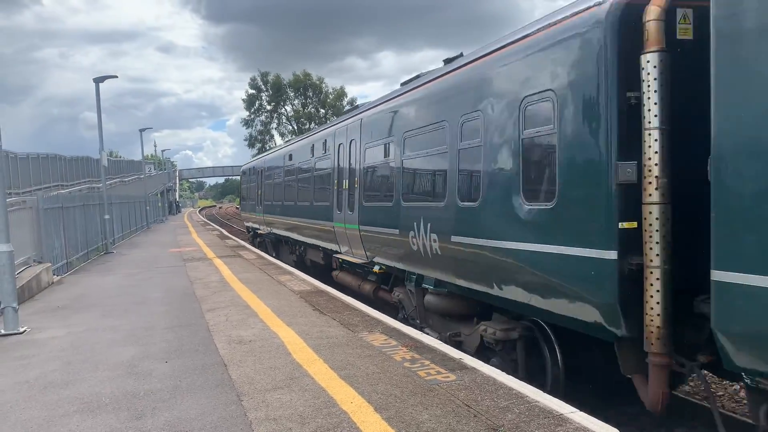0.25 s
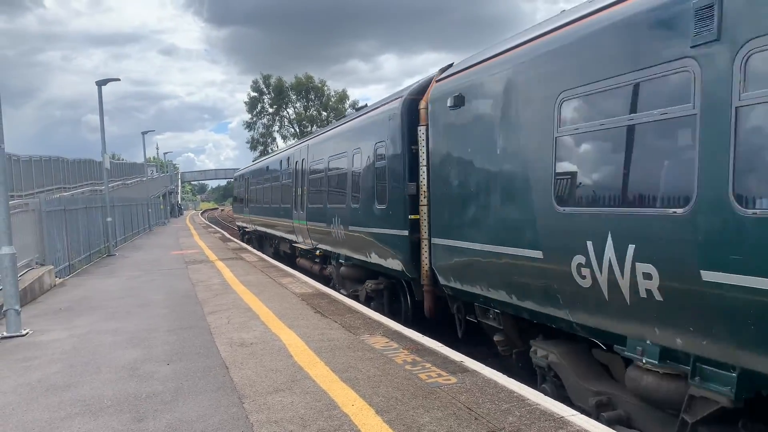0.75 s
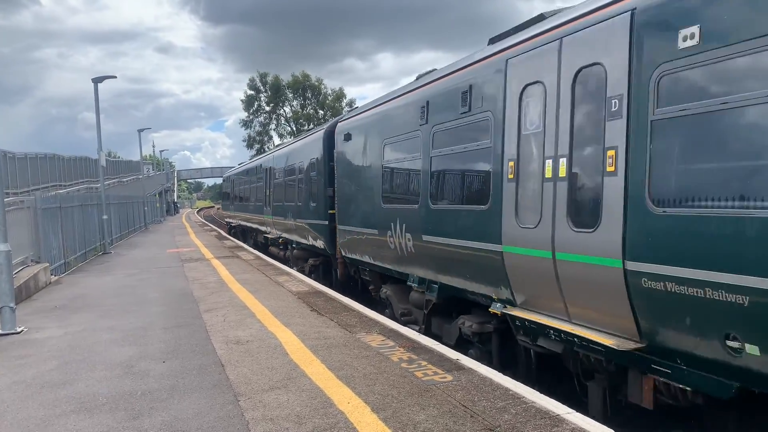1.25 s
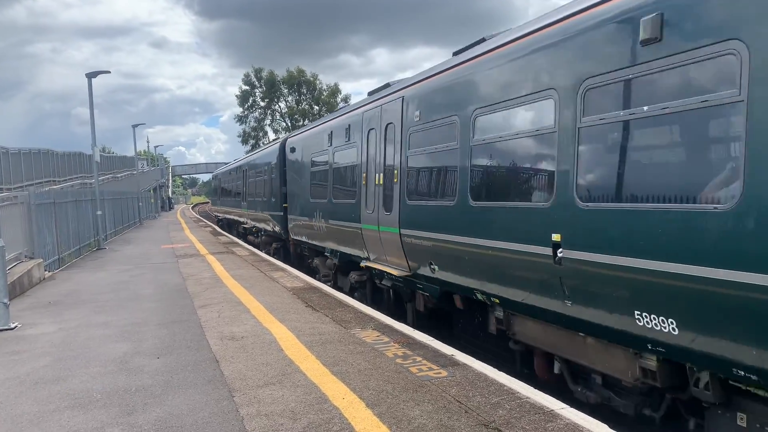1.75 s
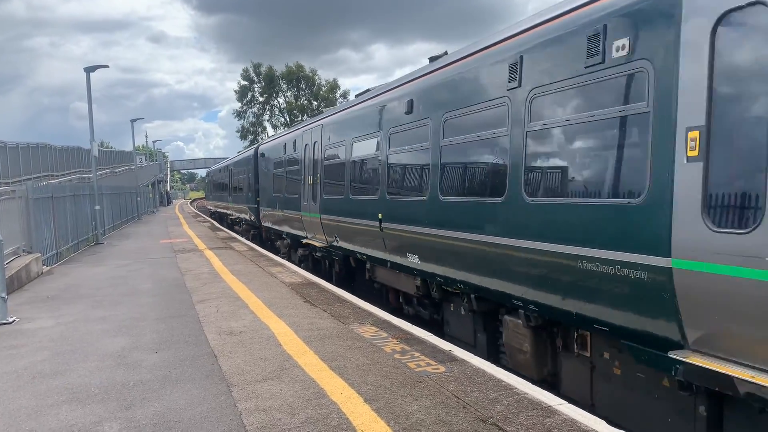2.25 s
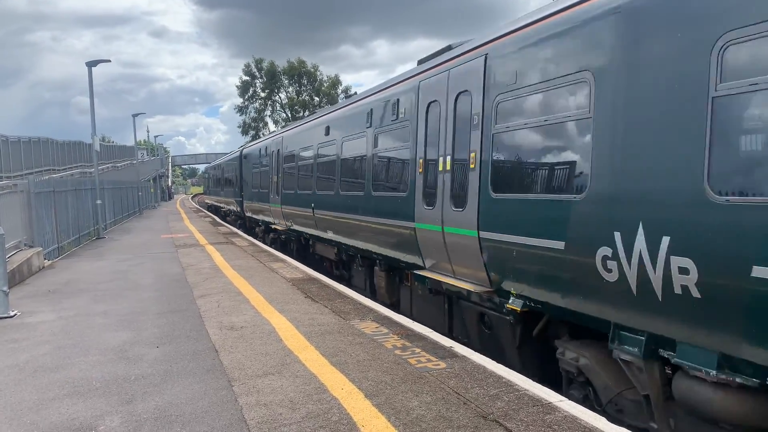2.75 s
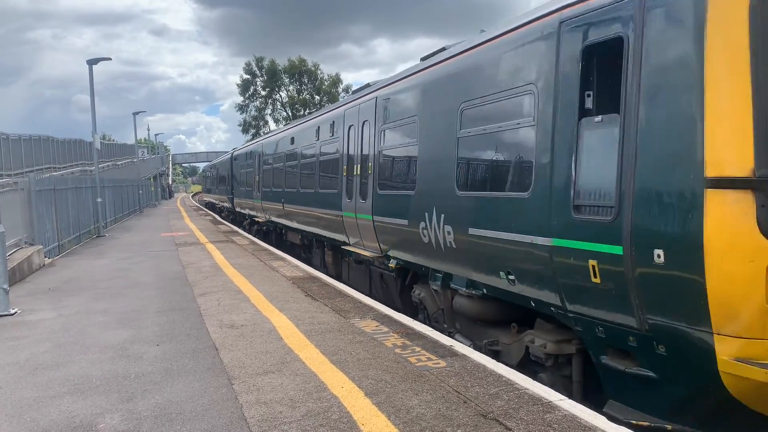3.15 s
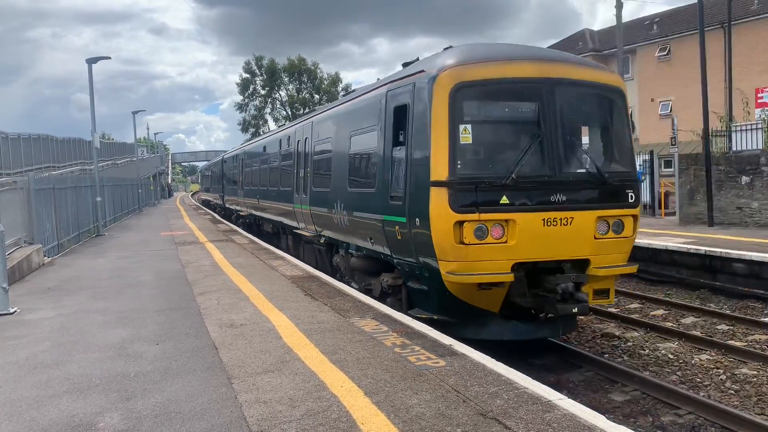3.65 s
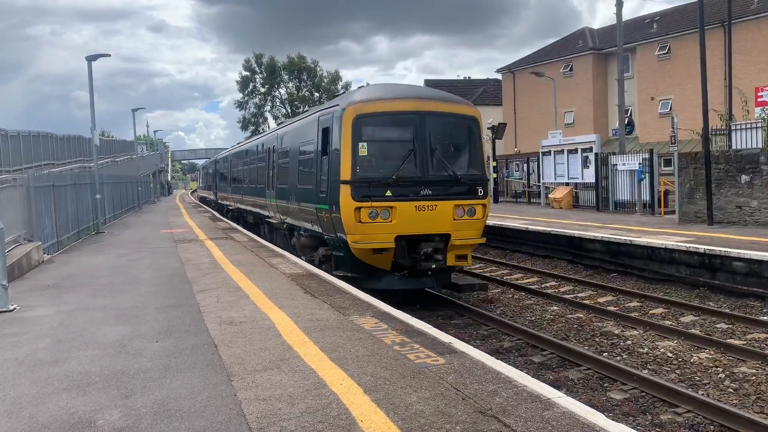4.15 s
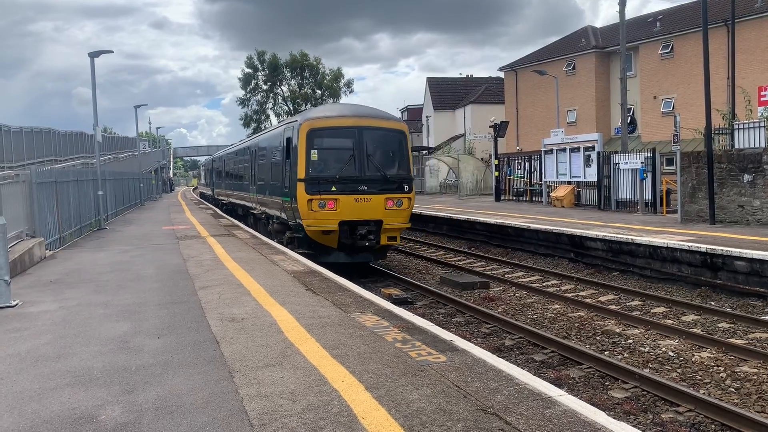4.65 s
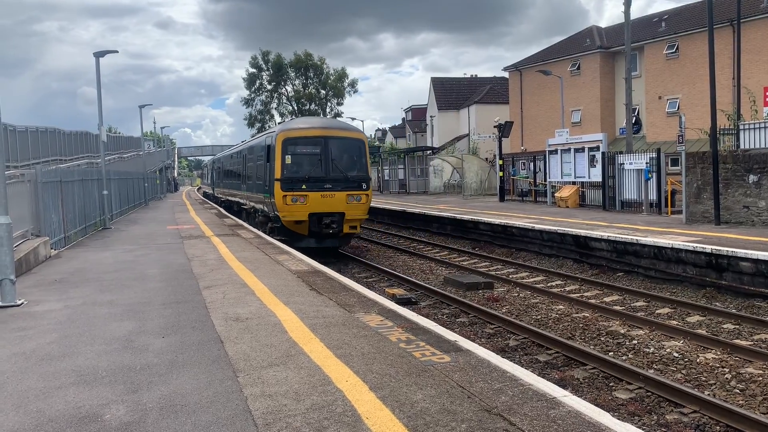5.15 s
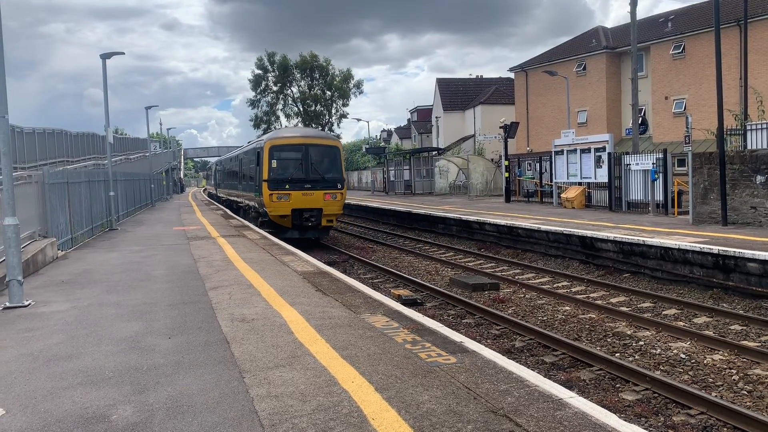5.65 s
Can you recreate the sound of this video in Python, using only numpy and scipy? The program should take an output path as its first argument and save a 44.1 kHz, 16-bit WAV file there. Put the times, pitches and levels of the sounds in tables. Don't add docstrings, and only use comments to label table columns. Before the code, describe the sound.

A diesel railcar train rolls past close to a platform, engines droning and rattling, wheels roaring and clanking over joints, then fades away down the line.

```python
import sys
import numpy as np
from scipy import signal
from scipy.io import wavfile
from scipy.ndimage import uniform_filter1d

SR = 44100
rng = np.random.default_rng(int(sys.argv[2]) if len(sys.argv) > 2 else 0)


def attenuation_scalar(level_db):
    decades = np.asarray(level_db, float) / 20
    return 10 ** decades


def dump(signal):
    limited = np.clip(np.atleast_2d(signal).T, -1, 1)
    pcm = np.round(limited * 32767).astype(np.int16)
    wavfile.write(sys.argv[1], SR, pcm)


N = 259742
T = np.arange(N) / SR


def evened(x):
    return x / np.sqrt(np.mean(x ** 2) + 1e-20)


def curve(rows, t, column):
    rows = np.array(rows)
    return np.interp(t, rows[:, 0], rows[:, column])


def read(rows, hz, column=1):
    rows = np.array(rows)
    return np.interp(np.log(hz + 1), np.log(rows[:, 0] + 1), rows[:, column])


def add(mix, s, sound):
    part = mix[..., round(s * SR):][..., :sound.shape[-1]]
    part += sound[..., :part.shape[-1]]


def wander(rate):
    hz = np.geomspace(rate / 8, rate, 12)
    turns = hz * T[::256, None] + rng.random(12)
    coarse = np.sin(2 * np.pi * turns).sum(1) / np.sqrt(6)
    return np.interp(T, T[::256], coarse)


def noise(near, far, distance, patchy_db, size=1024):
    frames, hz = 4 * N // size + 5, np.fft.rfftfreq(size, 1 / SR)
    gone = np.clip(curve(distance, np.arange(frames) * size / 4 / SR, column=1), 0, 1)
    colour_db = read(near, hz)[:, None] * (1 - gone) + read(far, hz)[:, None] * gone
    octaves_above = np.log2(hz / near[-1][0] + 1e-9)
    colour_db -= 30 * np.maximum(octaves_above, 0)[:, None]
    patches = uniform_filter1d(rng.standard_normal((frames, len(hz))).T, 10, 0)
    patches = evened(uniform_filter1d(patches, 10, 1))
    colour = attenuation_scalar(colour_db)
    gain = colour / np.sqrt(np.mean(colour ** 2, 0)) * attenuation_scalar(patchy_db * patches)
    z = (rng.standard_normal((2, frames, len(hz), 2)) @ [1, 1j]).transpose(0, 2, 1)
    return evened(signal.istft(z * gain, nperseg=size, noverlap=3 * size // 4)[1][:, :N])


def passing(rows, column=2, loss_db=0):
    rows = np.array(rows)
    since = T[::256, None] - rows[:, 0]
    loudest = attenuation_scalar(rows[:, column] - loss_db * np.maximum(since, 0))
    power = loudest ** 2 / (1 + (since / rows[:, 1]) ** 2)
    return np.interp(T, T[::256], 10 * np.log10(power.sum(1)))


def doppler(hz, abreast_s, reach_s):
    speed_m_s, sound_m_s = 12, 343
    since = T - abreast_s
    return hz * (1 - speed_m_s / sound_m_s * since / np.hypot(since, reach_s))


def drone(cycle_hz, level_db, orders):
    turns = np.cumsum(cycle_hz) / SR
    lines = np.zeros(N)
    for k, db, rise_db in orders:
        waver_db = 1.2 * (1 + T / 8) * wander(4.0)
        phase = 2 * np.pi * (k * turns + k * k / 5)
        lines += attenuation_scalar(db + rise_db * T + waver_db) * np.sin(phase)
    return np.sqrt(2) * attenuation_scalar(level_db) * lines


# t/s, level/dB
NEAR_EXHAUST = [(0, -19.5), (.1, -20), (.54, -23), (.8, -28), (1.1, -28.5), (1.43, -34.5), (1.65, -28),
                (1.9, -31.5), (2.05, -27), (2.28, -36.5), (2.6, -32.5), (3.25, -29.5), (3.47, -39.5),
                (3.95, -35.5), (4.3, -38), (5.0, -36), (5.2, -42), (5.89, -40)]
# multiple of the cycle, level/dB, rise/dB per s as the outlet turns to face back
NEAR_ORDERS = [(2, -7, .4), (3, -11.5, 1.1), (4, 1.5, 0), (5, -14, .7), (6, -12, 0.77), (7, -16.5, 0.5),
               (9, -30, -0.5), (10, -17, -1)]


def near_engine():
    cycle_hz = doppler(20.37, abreast_s=-.9, reach_s=.4)
    return drone(cycle_hz, curve(NEAR_EXHAUST, T, column=1) - 1.2, NEAR_ORDERS)


# multiple of the cycle, level/dB, rise/dB per s
LEAD_ORDERS = [(1, -2, 0), (2, -14.5, 0.12), (4, -6, 0.32)]
# abreast t/s, reach/s (distance / speed), level/dB
LEAD_OUTLETS = [
    (.7, 0.087, -31),
    (1.8, 0.45, -29),
]


def leading_engine():
    cycle_hz = doppler(34.15, abreast_s=1.15, reach_s=1.1)
    return drone(cycle_hz, passing(LEAD_OUTLETS, loss_db=6), LEAD_ORDERS)


# start t/s, end t/s, start f/Hz, end f/Hz, level/dB
WHINES = [(0, 1.2, 179, 174, -37), (.6, 1.45, 174, 168, -32), (.1, 1.1, 290, 440, -50),
          (1.55, 2.0, 358, 352, -41), (1.9, 2.78, 317, 314, -41.5), (2.9, 4.0, 314, 312, -46.5),
          (1.4, 1.7, 234, 238, -34), (2.1, 2.564, 130, 120, -34.5), (.9, 1.99, 810, 620, -46),
          (2.3, 3.1, 232, 229, -40), (4.75, 5.25, 156, 148, -42), (5.2, 5.6, 183, 180, -42.5),
          (5.0, 5.4, 128, 130, -45), (.7, 1.33, 365, 357, -36.5), (.7, 1.33, 262, 268, -38),
          (.65, 0.95, 222, 190, -43), (.7, 1.3, 220, 170, -42), (1.35, 1.4, 430, 338, -37),
          (2.9, 4.24, 1236, 1230, -57), (2.9, 4.0, 987, 890, -59), (3.0, 4.1, 1900, 1600, -63),
          (4.5, 5.4, 1618, 1612, -71), (4.2, 5.6, 2400, 1994, -68), (3.0, 3.1, 140, 168, -48),
          (3.2, 3.75, 132, 120, -40.5), (4.9, 5.2, 313, 310, -55), (2.9, 3.3, 250, 268, -43),
          (1.26, 1.36, 680, 790, -35), (4.4, 4.62, 92, 68, -38), (3.4, 3.7, 52, 72, -43),
          (2.35, 2.6, 1090, 1070, -48)]


def whines():
    out = np.zeros(N)
    for start, end, from_hz, to_hz, db in WHINES:
        size = round((end - start) * SR)
        tone = np.sin(2 * np.pi * np.cumsum(np.linspace(from_hz, to_hz, size)) / SR)
        level = attenuation_scalar(db + 3.5 + 1.8 * wander(7)[:size])
        add(out, start, level * signal.windows.tukey(size, .6) * tone)
    return out


# t/s, share gone 0-1, port delay factor
TURN = [(0, .3, .85), (.9, 0, 1.05), (1.4, .2, .9), (2.1, 1, .7)]
# f/Hz, level/dB per Hz
RUMBLE = [(24, -18), (38, 7), (52, 1.5), (75, 2.5), (130, 1), (220, -2.5), (320, -10), (600, -40)]
# abreast t/s, reach/s, level/dB
WHEELSETS = [(.1, 1.02, -24), (.88, 0.13, -26.5), (1.21, 0.098, -25), (2.38, 0.1, -29),
             (2.64, 0.043, -28.5), (3.1, 0.27, -35), (3.6, 0.074, -36.5), (4.3, .1, -43.5),
             (4.65, .12, -38.5), (5.25, 0.14, -37.5), (5.7, 0.23, -43)]


def rumble():
    level = attenuation_scalar(passing(WHEELSETS, loss_db=1.0) + 2.0)
    return level * noise(RUMBLE, RUMBLE, TURN, 1.73, size=4096)


# t/s, share 0-1
BITE = [(.3, 0.05), (1.15, 0.29), (2.2, 0.3), (4, 0.13)]


def firing():
    nearing = np.clip((1.45 - T) / .5, 0, 1)
    turns = 39.3 * (T - 1.452) - .4 * nearing
    bite = np.clip(curve(BITE, T, column=1), 0, 1)
    fired = np.diff(np.floor(turns), prepend=0) == 1
    uneven_db = 2.0 * rng.standard_normal(400)[np.cumsum(fired)]
    strength = attenuation_scalar(uneven_db + 0.5 * (-1.) ** np.floor(turns))
    gate = 1 - bite + 3.07 * bite * strength * np.exp(-(turns % 1) / 0.49)
    return fired, bite, gate


# abreast t/s, reach/s, wheel roar level/dB, engine clatter level/dB, air hiss level/dB
PARTS = [
    (-.3, 0.61, -32.5, -43, -58),
    (.9, 0.32, -28, -44.5, -99),
    (1.4, 0.41, -26, -44.5, -44.5),
    (1.47, 0.11, -50, -35.5, -47.5),
    (2.55, 0.44, -38.5, -45, -51.5),
]
# f/Hz, level/dB per Hz
ROAR_NEAR = [(150, -52), (280, -2.5), (400, -2), (620, -7), (1000, -5.5), (1500, -11), (2200, -16.5),
             (3200, -27), (6000, -45)]
# f/Hz, level/dB per Hz
ROAR_FAR = [(110, -22), (280, -4.5), (400, -1), (620, -5), (1000, -6.5), (1500, -10), (2200, -10.5),
            (3200, -18), (6000, -31.5)]


def rolling_roar(gate):
    level = attenuation_scalar(passing(PARTS, loss_db=0.31) + 2.0)
    return level * gate ** .5 * noise(ROAR_NEAR, ROAR_FAR, TURN, 1.07)


# f/Hz, level/dB per Hz
DISCS = [(600, -49), (880, -5), (980, 3), (1080, -0.5), (1250, -3), (1500, -49)]
# abreast t/s, reach/s, level/dB
DISC_PASSES = [
    (1.33, 0.24, -30.5),
    (3.7, 0.097, -44.5),
]


def wheel_discs(gate):
    return attenuation_scalar(passing(DISC_PASSES)) * gate ** 0.69 * noise(DISCS, DISCS, TURN, 2.5)


# t/s, share 0-1
LEAK = [(0, 0.2), (.8, 0.93), (1.05, 0.04), (2, 0.17), (4.6, 0.54)]
# f/Hz, level/dB per Hz
CLATTER = [(300, -25), (900, -12), (2500, -2), (3600, 5), (4350, 2), (4750, 9.5), (5150, 2), (6500, -7),
           (9000, -39)]
# f/Hz, level/dB per Hz
CLATTER_FAR = [(300, -36), (900, -11), (2500, -5.5), (3600, 0), (4350, 1), (4750, 2), (5150, -18),
               (6500, -11.5), (9000, -37)]
# f/Hz, level/dB, t60/s
BLOCK = [(3210, -7, 0.049), (3620, -3, 0.083), (3970, -8, 0.12), (4290, -2.5, 0.051), (4610, -0.5, 0.11),
         (4920, -11.5, 0.049), (9500, -6, 0.025)]


def clatter(fired, bite, gate):
    t, rings = np.arange(2000) / SR, np.zeros((2, N))
    soft = 1 - np.exp(-t / .0015)
    size = (2, fired.sum())
    for hz, db, t60 in BLOCK:
        blows = np.zeros((2, N))
        uneven = attenuation_scalar(4 * rng.standard_normal(size))
        blows[:, fired] = uneven * bite[fired] * rng.choice([-1, 1], size)
        ring = attenuation_scalar(db - 60 * t / t60) * soft * np.sin(2 * np.pi * hz * t)
        ring *= 1 + np.cos(2 * np.pi * 0.0277 * hz * t)
        rings += signal.oaconvolve(blows, ring[None], axes=1)[:, :N]
    body = gate ** 0.11 * noise(CLATTER, CLATTER_FAR, LEAK, 2.15, size=256)
    sway = T + .0007 * wander(8)
    rings = attenuation_scalar(-8) * evened(np.array([np.interp(sway, T, ring) for ring in rings]))
    return attenuation_scalar(passing(PARTS, column=3, loss_db=0.5)) * (body + rings)


# f/Hz, level/dB per Hz
HISS = [(4000, -1), (6000, 3), (8800, 2.5), (9500, 7.5), (10300, 3.5), (12000, -0.5), (14300, -2),
        (15800, -21)]
# f/Hz, level/dB per Hz
HISS_FAR = [(4000, -6.5), (6000, -3.5), (8000, -5), (9500, -6.5), (11000, -14.5), (12500, -17.5),
            (14200, -23), (15800, -38)]
# t/s, peak level/dB
PUFFS = [(0.14, -30), (0.9527, -46), (1.1039, -42), (1.1553, -27.5), (1.254, -26), (1.306, -28),
         (1.4042, -29), (1.4536, -25.5), (1.5569, -32), (1.5724, -29), (1.6094, -33), (1.8342, -36),
         (2.0398, -29.5), (2.5785, -40), (3.345, -46)]


def air(gate):
    t, puffs = np.arange(5000) / SR, np.zeros(N)
    puff_t60_s = 0.058
    for s, db in PUFFS:
        decay_db = 60 * np.maximum(t - .01, 0) / puff_t60_s
        add(puffs, s, attenuation_scalar(db - 9.0 - decay_db) * (1 - np.exp(-t / 0.001)))
    band = signal.butter(2, [6000, 15000], "bandpass", fs=SR, output="sos")
    jet = evened(signal.sosfilt(band, rng.standard_normal((2, N))))
    level = attenuation_scalar(passing(PARTS, column=4, loss_db=0.76) + 2.5) * gate ** 0.62
    return level * noise(HISS, HISS_FAR, LEAK, 1.7, size=256) + puffs * jet


# f/Hz, width f/Hz, level/dB
RAIL = [(747, 25, -3), (990, 50, 0.5), (1239, 27, -2.5), (1625, 32, -5), (1748, 30, -6.5), (2000, 40, -6.5),
        (2220, 39, -7), (3730, 100, -12.5), (4520, 90, -15)]
# abreast t/s, reach/s, level/dB
RAIL_PASSES = [
    (1.5, 0.44, -44),
    (3.4, 0.71, -59),
]


def rail():
    out, step = np.zeros((2, N)), 32
    for hz, width_hz, db in RAIL:
        keep = np.exp(-np.pi * width_hz * step / SR)
        grit = rng.standard_normal((2, N // step + 1, 2)) @ [1, 1j]
        slow = signal.lfilter([1], [1, -2 * keep, keep ** 2], grit)
        slow = slow / np.sqrt(np.mean(abs(slow) ** 2) / 2)
        slow = np.repeat(slow, step, axis=1)[:, :N]
        out += attenuation_scalar(db + 3.3 * wander(2.51)) * (slow * np.exp(2j * np.pi * hz * T)).real
    return attenuation_scalar(passing(RAIL_PASSES)) * out


# f/Hz, level/dB per Hz
RUB = [(1400, -34), (1900, -1), (2300, -5), (2800, 0), (3400, -30)]
# abreast t/s, reach/s, level/dB
RUB_PASSES = [
    (.9, 0.18, -39),
]


def brake_rub(gate):
    return attenuation_scalar(passing(RUB_PASSES, loss_db=12)) * gate * noise(RUB, RUB, TURN, 3.2, size=256)


# t/s, peak level/dB, start f/Hz, t60/s
THUMPS = [(1.548, -4.5, 93, 0.082), (2.355, -12.5, 170, 0.11), (4.5655, -13.5, 262, 0.051),
          (4.573, -17, 140, .08), (2.212, -17, 127, .08), (2.464, -21, 100, 0.065), (5.008, -9, 76, 0.052),
          (0.76, -14, 120, .06), (1.205, -9.5, 195, 0.061), (2.63, -13, 204, 0.071), (3.561, -16, 90, 0.15),
          (5.531, -19, 78, .1), (5.65, -20, 92, 0.093), (2.95, -16, 200, 0.098), (5.22, -19.5, 112, 0.15)]


def thumps():
    t, out = np.arange(8000) / SR, np.zeros(N)
    for s, db, hz, t60 in THUMPS:
        turns = np.cumsum(hz * (.42 + .58 * np.exp(-t * hz / 3.0))) / SR
        rise = 1 - np.exp(-t * hz / .9)
        add(out, s, attenuation_scalar(db - 60 * t / t60) * rise * np.sin(2 * np.pi * turns))
    return out


# t/s, peak level/dB, ring f/Hz
CLANKS = [
    (.857, -22, 900),
    (1.128, -21, 980),
    (1.155, -25, 900),
    (1.206, -17, 1000),
    (1.256, -19, 1040),
    (1.304, -16, 837),
]


def clanks():
    t, out = np.arange(1500) / SR, np.zeros((2, N))
    for s, db, hz in CLANKS:
        rise = 1 - np.exp(-t / 0.0016)
        add(out, s, attenuation_scalar(db - 60 * t / 0.068) * rise * np.sin(2 * np.pi * hz * t))
    return out


# t/s, peak level/dB, ring f/Hz,
# second panel f/Hz, its level/dB against the ring
KNOCKS = [(0.8805, -33, 4770, 3480, -1), (0.9043, -36, 4920, 3520, -1), (0.9304, -33, 4800, 3920, -2),
          (0.9535, -29, 4980, 3600, 0), (1.0027, -27.5, 4770, 3620, 1), (1.0279, -32, 4750, 3530, 6),
          (1.0519, -32, 4370, 3830, 2), (1.0748, -28, 4820, 3670, -3), (1.1025, -27, 4910, 4710, 0),
          (1.1274, -30, 4980, 3450, 1), (1.1519, -24.5, 4730, 3490, -7), (1.2022, -30, 3370, 4680, -3),
          (1.2256, -31, 3510, 4770, -2), (1.2512, -28, 4720, 3650, 0), (1.2761, -31, 3930, 4480, -2),
          (1.3009, -23, 3420, 4900, -3), (1.326, -26, 4410, 3350, -3), (1.3519, -28, 3600, 4640, 0),
          (1.377, -24.5, 4550, 3640, 0), (1.4029, -25, 4510, 3950, 0), (1.4269, -27, 3600, 3990, -5),
          (1.451, -20, 4090, 4630, 0), (1.4771, -21, 4620, 4240, -6), (1.5012, -22, 3960, 4330, -1),
          (1.5287, -23, 3550, 3980, -1), (1.5596, -29, 4740, 3920, -1), (1.5793, -30, 3560, 4240, -3),
          (1.6055, -28, 4410, 4020, -9), (1.6563, -36, 3320, 3880, -1), (1.6818, -33, 4610, 4190, 0)]
# same columns, t/s, level/dB, f/Hz, f/Hz, level/dB
KNOCKS_LEAVING = [(1.7122, -34, 4520, 3100, 0), (1.7559, -36, 3550, 3230, -5),
                  (1.7843, -37, 3650, 4650, -2), (1.8088, -35.5, 3620, 4450, -4),
                  (1.8338, -29, 4650, 3520, -2), (1.8604, -29, 4530, 3430, -5),
                  (1.8849, -32, 4640, 4410, -3), (1.911, -29, 3550, 4210, -5), (1.9356, -35, 3400, 4340, 0),
                  (1.9858, -27.5, 4640, 3900, -9), (2.0142, -31, 4750, 4480, -4),
                  (2.0378, -35, 3470, 3870, 0), (2.0623, -31, 4530, 3400, -5),
                  (2.0892, -34, 3470, 4600, -5), (2.1144, -31, 3660, 4400, 0),
                  (2.1641, -32, 4690, 3250, -4), (2.19, -31.5, 4370, 3630, -6),
                  (2.2159, -30, 3740, 4450, -2), (2.2395, -34, 3880, 4180, -2),
                  (2.2886, -35, 3570, 3240, -2), (2.3179, -35, 3240, 3880, 0), (2.345, -34, 3240, 4150, -3),
                  (2.37, -35, 4650, 3220, 0), (2.3922, -35, 4610, 3810, -3), (2.4227, -31, 4330, 3970, 0),
                  (2.4449, -36, 4530, 3750, -1), (2.4717, -36, 4480, 3350, 0),
                  (2.4945, -36, 3740, 4710, -1), (2.5226, -35, 3660, 3920, 0),
                  (2.5762, -27, 4740, 4480, -5), (2.6255, -36, 3740, 4120, 0), (2.651, -36, 3270, 3790, -2),
                  (2.6785, -34, 3320, 3520, 0), (2.7271, -36, 4290, 3780, 0), (2.7798, -37, 4470, 3130, -2),
                  (2.803, -33.5, 3240, 3730, -4), (2.8293, -39, 3480, 4130, -1),
                  (2.8807, -41, 3260, 3750, 0), (2.9082, -40, 3200, 3600, -10)]


def knocks():
    t, out = np.arange(1500) / SR, np.zeros((2, N))
    band = signal.butter(3, [3000, 5200], "bandpass", fs=SR, output="sos")
    for s, db, hz, other_hz, other_db in [*KNOCKS, *KNOCKS_LEAVING]:
        grit, wait = rng.standard_normal((2, 1500)), rng.random()
        crack = attenuation_scalar(-60 * t / 0.035) * evened(signal.sosfilt(band, grit))
        fuzz = .9 + 0.8 * evened(uniform_filter1d(grit[0], 30))
        ring = attenuation_scalar(-60 * t / 0.062) * fuzz * np.sin(2 * np.pi * hz * t)
        other = attenuation_scalar(other_db - 60 * t / .055) * fuzz[::-1] * np.sin(2 * np.pi * other_hz * t)
        rise = attenuation_scalar(db - 2.5) * (1 - np.exp(-t / 0.0016))
        add(out, s, rise * (.8 * ring + .55 * crack))
        add(out, s + .003 * wait, .6 * rise * other)
    return out


# f/Hz, likeness 0-1, left lead/rad, left-right level/dB
ALONGSIDE = [(30, 1, 1.5, -6.5), (312, 0.9, -1.23, 4), (715, 0.93, -2.5, -0.5), (1480, 0.94, -3, -1.5),
             (3020, 0.3, -6, 1), (4580, 0.8, -9.5, -1.5), (7100, 0.2, -15, -2)]
# f/Hz, likeness 0-1, left lead/rad, left-right level/dB
GONE = [(30, 0.7, 0.5, -2.5), (317, 1, -0.85, -1.5), (715, 0.78, -0.4, 0), (1500, 0.55, -1.5, 2.5),
        (2680, 0.056, 4.5, 1.5), (3550, 0.29, 0, 0.5), (5240, 0.44, 2.5, -3), (6740, 0.23, 0, -3.5),
        (6860, 0.31, -5.5, 0)]


def ports(pair):
    hz, t, (a, b) = signal.stft(pair, SR, nperseg=512, noverlap=384)
    gone, delay = curve(TURN, t, column=1), curve(TURN, t, column=2)
    alongside = [read(ALONGSIDE, hz, column=k)[:, None] for k in (1, 2, 3)]
    away = [read(GONE, hz, column=k)[:, None] for k in (1, 2, 3)]
    like = (1 - gone) * alongside[0] * np.exp(1j * alongside[1] * delay)
    like = like + gone * away[0] * np.exp(1j * away[1])
    top = np.clip((hz[:, None] - 7000) / 1800, 0, 1)
    like = (1 - top) * like + top * .978 * np.exp(-2j * np.pi * (hz[:, None] - 10250) / 3200)
    like /= np.maximum(abs(like), 1)
    lean_db = ((1 - gone) * alongside[2] + gone * away[2]) * (1 - top)
    lean = attenuation_scalar(lean_db / 2)
    right = like.conj() * a + np.sqrt(abs(1 - abs(like) ** 2)) * b
    both = np.array([a * lean, right / lean])
    return signal.istft(both, SR, nperseg=512, noverlap=384)[1][:, :N]


def scene():
    fired, bite, gate = firing()
    low = near_engine() + leading_engine() + whines() + thumps()
    wheels = rumble() + rolling_roar(gate) + wheel_discs(gate) + rail() + brake_rub(gate) + clanks()
    engine = clatter(fired, bite, gate) + air(gate) + knocks()
    lag = 13 * np.clip((2.2 - T) / .8, 0, 1)
    late = np.interp(np.arange(N) - lag, np.arange(N), low)
    return ports(wheels + engine) + np.array([late, low])


def roll_off(x):
    return signal.sosfilt(signal.butter(12, 15780, fs=SR, output="sos"), x)


def record(dry):
    bass_cut = signal.butter(8, 32, "highpass", fs=SR, output="sos")
    mix = signal.sosfilt(bass_cut, dry)
    return roll_off(mix)


dry = scene()
out = record(dry)
dump(out)
```